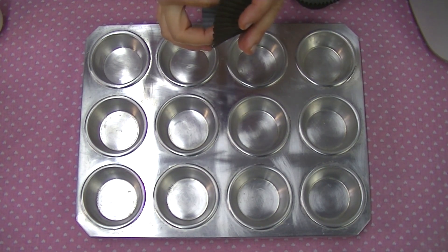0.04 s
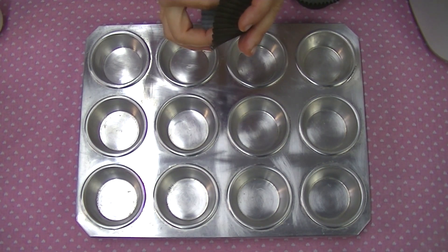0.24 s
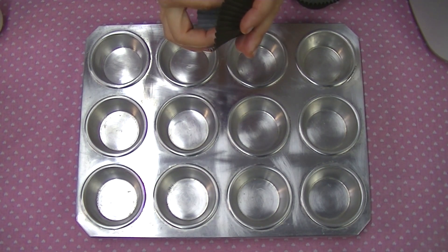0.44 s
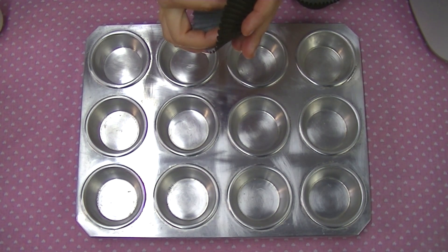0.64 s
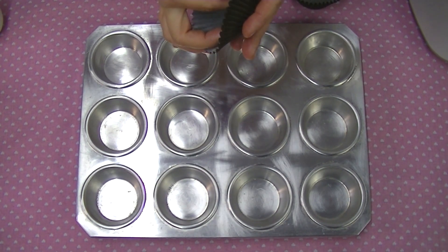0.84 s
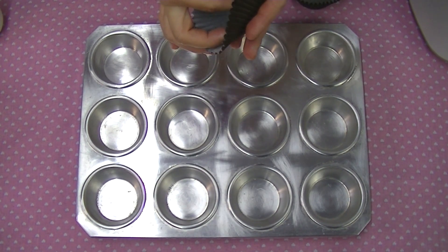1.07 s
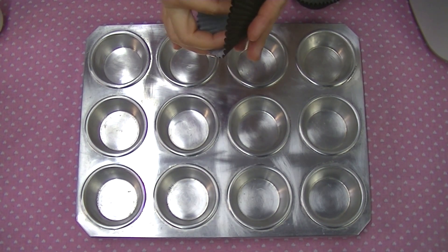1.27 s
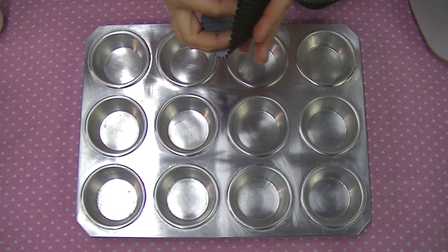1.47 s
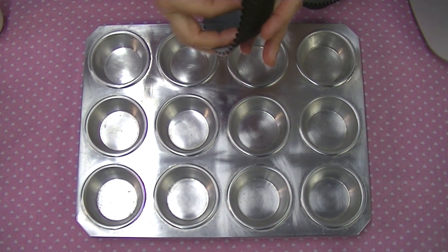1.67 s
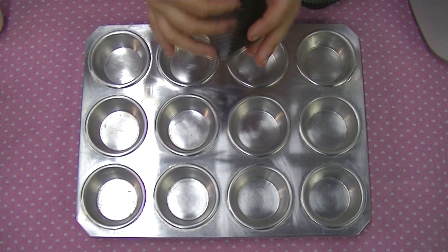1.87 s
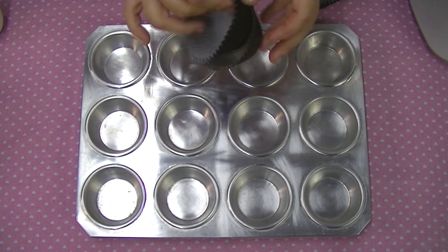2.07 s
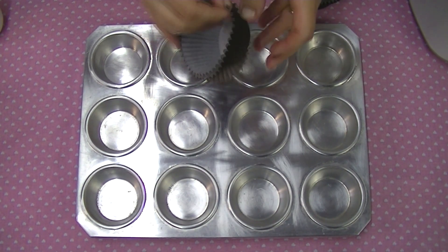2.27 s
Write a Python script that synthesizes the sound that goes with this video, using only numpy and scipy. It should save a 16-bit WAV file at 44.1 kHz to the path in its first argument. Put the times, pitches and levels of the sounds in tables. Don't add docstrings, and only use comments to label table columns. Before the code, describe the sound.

Stiff pleated paper snaps and crackles irregularly between fingers, heard close up, with brief pauses, light hollow pops and a last scraping, squeaky pull as the cup comes free; short room reflections over very quiet hum.

```python
import sys
import numpy as np
from scipy import signal
from scipy.fft import rfft, irfft, next_fast_len
from scipy.io import wavfile
from scipy.ndimage import uniform_filter1d

SR = 44100
rng = np.random.default_rng(int(sys.argv[2]) if len(sys.argv) > 2 else 0)


def inscribe(sig):
    pcm = np.round(np.clip(np.atleast_2d(sig).T, -1, 1) * 32767)
    wavfile.write(sys.argv[1], SR, pcm.astype(np.int16))


def amplitude_ratio(level_db):
    exponent = np.asarray(level_db, float) / 20
    return 10 ** exponent


N = 102179
PADDED = next_fast_len(N + SR // 2)
FREQ = np.fft.rfftfreq(PADDED, 1 / SR)
TIME = np.arange(N) / SR

# pitch_hz, level_db
HUM_COLOUR = [(25, -26), (120, -24.5), (170, -14.5), (240, -16.5), (370, -2), (900, -5), (1900, -13),
              (7000, -21.5), (15500, -26.5)]
# pitch_hz, likeness (0 to 1)
LEFT_RIGHT_LIKENESS = [(25, 0.41), (60, 0.19), (240, 0.86), (950, 0.79), (3770, 0.7), (8000, 1), (15000, 1)]
# pitch_hz, time_to_fade_60_db_s
WALL_FADE = [(300, 0.15), (2000, 0.41), (8000, 0.26), (15000, 0.2)]
# start_s, rise_s, fall_s, level_db, tilt_db_per_octave
SLIDES = [(0.065, 0.0047, 0.052, -54.5, -3.5), (0.162, 0.067, 0.023, -56.5, -3),
          (0.268, 0.0085, 0.012, -61.5, -4.5), (0.755, 0.018, 0.036, -73.5, -9.5),
          (0.899, 0.059, 0.086, -55.5, -5), (0.972, 0.028, 0.04, -57, -9), (1.111, 0.012, 0.03, -51, -5),
          (1.329, 0.0072, .07, -57.5, -8), (1.487, 0.0045, 0.046, -53, -4.5),
          (1.539, 0.039, 0.028, -56, -2.5), (1.65, 0.09, 0.25, -53, -5), (1.76, 0.033, 0.0085, -66, -10.5),
          (1.839, 0.014, 0.015, -53, -3.5), (1.894, 0.0054, 0.068, -57.5, -3),
          (1.967, 0.0034, 0.028, -50, 0.5), (1.986, 0.004, 0.1, -55, 0), (2.023, 0.008, 0.053, -43, 2),
          (2.042, 0.03, 0.058, -36.5, 1), (2.121, 0.012, 0.064, -45.5, 0),
          (2.164, 0.0089, 0.072, -53.5, -3.5), (2.275, 0.01, 0.032, -56.5, 6),
          (2.207, 0.027, 0.054, -41.5, -0.5), (2.248, 0.022, 0.073, -48, -3),
          (2.303, 0.0068, .03, -55, 5.5)]
# pitch_hz, level_db
PAPER_COLOUR = [(180, -68), (300, -63), (348, -46), (1120, -13.5), (2570, -11), (3190, -14.5), (10700, -6),
                (16000, -20)]
# pitch_hz, width_hz, level_db
CUP_TONES = [(1155, 44, 14), (2204, 475, 11.5), (3200, 250, 16.5), (4190, 810, 14.5)]
CUP_FREE_S = 2.01, 2.245
# from_s, to_s, pitch_hz, width_hz, level_db
GAPS = [(0.93, 1.2, 7480, 840, 2), (0.91, 0.99, 3900, 600, -4), (1.016, 1.1, 2300, 650, 7),
        (1.3, 1.43, 1240, 1200, -6.5), (1.5, 1.68, 4730, 500, -3.5), (2.125, 2.21, 6400, 2700, 0),
        (2, 2.07, 1190, 380, 2), (2.14, 2.27, 1030, 350, 2.5), (2.22, 2.29, 3220, 480, 5),
        (1.78, 1.87, 2040, 350, -0.5)]
# start_s, length_s, pitch_hz, level_db
SQUEAKS = [(1.78, 0.013, 1844, -49), (2.065, 0.011, 3090, -50), (2.08, .01, 4220, -39),
           (2.089, 0.029, 3200, -39.5), (2.12, 0.014, 3200, -51), (2.166, 0.0091, 11650, -50),
           (2.168, 0.016, 3440, -50), (2.242, 0.016, 4210, -45), (2.259, 0.025, 4023, -43),
           (2.264, 0.013, 2370, -55), (2.28, 0.011, 9900, -49)]
# start_s, peak_db, pitch_hz, time_to_fade_60_db_ms
POPS = [(.279, -53, 2500, 13), (.341, -47, 1194, 20), (.357, -57.5, 927, 20), (.643, -58, 1740, 43),
        (.669, -43, 1610, 11.3), (.717, -43.5, 1310, 9.4), (.749, -39, 1636, 14.6), (.750, -48.5, 420, 35),
        (.7595, -56, 1680, 11), (.768, -60, 1390, 11), (.778, -51, 1130, 18), (.789, -52.5, 1204, 20),
        (.796, -58, 1490, 8.6), (.809, -63, 1480, 9.2), (.962, -42, 2040, 12), (1.0375, -24, 2060, 3.7),
        (1.266, -46, 810, 12), (1.319, -38, 890, 8.1), (1.3735, -41, 1070, 9.5), (1.4092, -44, 1660, 13),
        (1.449, -52.5, 1000, 10), (1.5128, -37, 1520, 6.2), (1.512, -45.5, 443, 25),
        (1.5266, -39.5, 980, 7), (1.540, -42, 1660, 10), (1.543, -37.5, 846, 8.1), (1.574, -50, 700, 15),
        (1.733, -40, 1680, 9.4), (1.7785, -27, 1896, 13.5), (1.779, -34.5, 4100, 9.3),
        (2.121, -38, 2640, 27)]
# middle_s, peak_db, pitch_hz, half_length_ms, pitch_spread (natural log)
TEARS = [(.710, -39, 5400, 2.7, 0.75), (.9015, -20.5, 8600, 1.77, 0.76), (.949, -33, 9500, 1, 0.34),
         (.990, -20, 10100, 3.5, 0.51), (.9955, -21, 8000, 1.8, 0.56), (1.0065, -11.5, 9500, 1.9, 0.51),
         (1.039, -15, 8000, 1.3, 0.575), (1.073, -29, 8800, 2.7, 0.65), (1.117, -10.5, 9560, 2.39, 0.75),
         (1.279, -33.5, 4200, 3.8, .3), (1.492, -27.5, 11000, 2.16, 0.76), (1.765, -27.5, 4600, 2.5, 0.33),
         (1.946, -39, 9500, 1.1, 0.34), (2.052, -23, 7000, 2.2, 0.3), (2.065, -14, 8600, 1.93, 0.43),
         (2.085, -13, 10000, 2.66, .35), (2.2, -27.5, 8000, 1.6, 0.65), (2.239, -20.5, 4120, 2.31, .5)]
# start_s, peak_db, pitch_hz, length_ms, pitch_spread (natural log)
SNAPS = [(.279, -47.5, 3000, 2.2, 0.33), (.542, -36.5, 6050, 3.95, 0.76), (.644, -46.5, 5000, 2.6, 0.13),
         (.669, -25.5, 5620, 2.26, 0.246), (.7165, -29.5, 7550, 3.56, 0.67),
         (.8565, -40.5, 7750, 2.8, 0.72), (.9115, -24, 10000, 1.62, 0.52), (.9245, -32.5, 9700, 2.5, .55),
         (.935, -43, 9000, 1.1, 0.49), (.9558, -25, 8400, 5.2, 0.57), (.9745, -46, 10000, 1.7, 0.33),
         (1.0205, -40, 9100, 1.5, 0.35), (1.0995, -23.5, 8700, 2.6, 0.85), (1.110, -24, 4000, 3.13, 0.66),
         (1.1812, -28.5, 11300, 3.5, 0.47), (1.2275, -40, 9000, 2.8, .59), (1.2325, -28, 3700, 2.03, 0.36),
         (1.238, -26, 4900, 1.3, 0.54), (1.2395, -15.5, 6800, 3.8, 0.79), (1.308, -38, 11000, 2, 0.29),
         (1.319, -23.5, 2810, 3.04, 0.26), (1.3325, -20, 8960, 2.8, 0.59), (1.3735, -43, 4030, 1.4, .5),
         (1.398, -41.5, 6460, 2.3, 0.36), (1.461, -47, 9500, 2, .25), (1.479, -44, 9700, 1.5, 0.52),
         (1.4985, -43, 8600, 1.9, 0.47), (1.5125, -40.5, 3200, 2.2, 0.53), (1.5263, -37.5, 2170, 1.9, 0.29),
         (1.699, -28.5, 4750, 3.1, 0.071), (1.6993, -25, 10900, 3, 0.35), (1.7185, -26, 10300, 3.96, 0.32),
         (1.7243, -24, 10200, 2, 0.54), (1.7285, -26.5, 11100, 2, 0.42), (1.7325, -28, 10700, 1.5, 0.54),
         (1.754, -52, 10000, 1.5, .3), (1.759, -19, 11400, 4.6, 0.41), (1.9145, -35, 4500, 3.3, 0.048),
         (1.9755, -44, 9000, 2.5, .4), (1.9895, -35, 10000, 4, 0.25)]

HUM_DB = -66
WHINE_HZ, WHINE_WIDTH_HZ, WHINE_DB = 5600, 1000, -6
ROOM_DB, ROOM_SIDE_DB, WALL_S = -9.5, -20, 0.004
TRAY_S, TRAY_DB = 0.00137, -21
RISE_DB, FALL_DB = 12.5, 19.5
SHEET_HZ, CUP_HZ = 700, 237
DULL_HZ, TOP_HZ = 16400, 15800


def unit(x):
    return x / np.sqrt(np.mean(x ** 2) + 1e-20)


def along(points, hz):
    f, v = np.transpose(points)
    return np.interp(np.log(hz + 1), np.log(f + 1), v)


def filtered(x, response):
    return irfft(rfft(x, PADDED) * response, PADDED)[..., :N]


def resonance(hz, width_hz):
    return 1j * FREQ * width_hz / (hz * hz - FREQ ** 2 + 1j * FREQ * width_hz)


def high_pass(hz):
    return (1j * FREQ / hz / (1 + 1j * FREQ / hz)) ** 4


def grains(start_s, hz, fade_s, gain, phase, size=256, onset=4):
    t = np.arange(size) / SR
    wave = np.sin(2 * np.pi * (hz[:, None] * t + phase[:, None]))
    wave = gain[:, None] * wave * amplitude_ratio(-60 * t / fade_s[:, None])
    wave = wave * (1 - np.exp(-onset * t * hz[:, None]))
    first = np.round(np.clip(start_s, 0, None) * SR).astype(int)
    where = first[:, None] + np.arange(size)
    return np.bincount(where.ravel(), wave.ravel(), N + SR)[:N]


def hum():
    whine_gain = amplitude_ratio(along(HUM_COLOUR, WHINE_HZ) + 12.0 + WHINE_DB)
    whine = whine_gain * np.abs(resonance(WHINE_HZ, WHINE_WIDTH_HZ)) ** 2
    colour = amplitude_ratio(along(HUM_COLOUR, FREQ)) + whine
    turn = np.arccos(np.clip(along(LEFT_RIGHT_LIKENESS, FREQ), -1, 1)) / 2
    noise = rng.standard_normal((2, N))
    mid, side = filtered(noise, colour * [np.cos(turn), np.sin(turn)])
    return amplitude_ratio(HUM_DB) * unit(np.array([mid + side, mid - side]))


def kitchen(x, count=8):
    wet = np.zeros((2, N + SR))
    for k, part in enumerate(np.array_split(x, count)):
        hz, t, z = signal.stft(rng.standard_normal((2, SR // 2)), SR, nperseg=256)
        fade = amplitude_ratio(-60 * t / along(WALL_FADE, hz)[:, None])
        tail = signal.istft(z * fade, SR, nperseg=256)[1]
        answer = signal.fftconvolve(part[None], tail / np.linalg.norm(tail[0]), axes=1)
        at = k * (N // count + 1) + int(WALL_S * SR)
        wet[:, at:at + answer.shape[1]] += answer
    mid, side = wet[0, :N], amplitude_ratio(ROOM_SIDE_DB) * wet[1, :N]
    return np.array([mid + side, mid - side])


def tray(paper):
    echo = amplitude_ratio(TRAY_DB) * np.exp(-2j * np.pi * FREQ * TRAY_S)
    return filtered(paper, (1 + echo) / (1 + (FREQ / DULL_HZ) ** 6))


def fibre_ticks(count=90000, clump_db=1, clump_s=0.002, patchy_db=2.2):
    ticks = np.bincount(rng.integers(N, size=count), rng.standard_normal(count), N)
    wide = int(clump_s * SR) + 1
    clumps = uniform_filter1d(uniform_filter1d(rng.standard_normal(N), wide), wide)
    ticks = ticks * amplitude_ratio(clump_db * unit(clumps))
    z = signal.stft(ticks, nperseg=128)[2]
    patches = uniform_filter1d(rng.standard_normal(z.shape), size=3, axis=0)
    patches = uniform_filter1d(patches, size=7, axis=1)
    return unit(signal.istft(z * amplitude_ratio(patchy_db * unit(patches)), nperseg=128)[1][:N])


def slides(pivot_hz=4000):
    ticks = fibre_ticks()
    octaves = np.log2((FREQ + 300) / pivot_hz)
    size = 2 * len(FREQ) - 2
    spectrum = 0
    for s, rise, fall, db, tilt in SLIDES:
        top = s + rise
        moments = [s - 0.002, s, top, top + fall, top + 2 * fall]
        stroke_db = np.interp(TIME, moments, [-60, -RISE_DB, 0, -FALL_DB, -60])
        spectrum = spectrum + rfft(ticks * amplitude_ratio(db + stroke_db), size) * amplitude_ratio(tilt * octaves)
    colour = amplitude_ratio(along(PAPER_COLOUR, FREQ))
    rub = irfft(spectrum * colour / np.sqrt(np.mean(colour ** 2)))[:N]
    singing = np.interp(TIME, CUP_FREE_S, [0.3, 0.16])
    cup = sum(amplitude_ratio(db) * resonance(hz, width) for hz, width, db in CUP_TONES)
    return rub + filtered(rub * singing, cup)


def gaps(x, edge_s=0.0061):
    rings = 0
    for a, b, hz, width, db in GAPS:
        is_open = np.interp(TIME, [a - edge_s, a, b, b + edge_s], [0, 1, 1, 0])
        rings = rings + amplitude_ratio(db) * filtered(x * is_open, resonance(hz, width))
    return x + rings


def squeaks(rough_s=0.0021):
    total = 0
    for s, length, hz, db in SQUEAKS:
        swell = np.sin(np.pi * np.clip((TIME - s) / length, 0, 1)) ** 0.19
        flutter = filtered(rng.standard_normal(N), resonance(hz, 1 / (np.pi * rough_s)) ** 2)
        total = total + amplitude_ratio(db) * swell * unit(flutter)
    return total


def pops(count=5):
    s, db, hz, ms = (c[:, None] for c in np.transpose(POPS))
    step = np.array([0, -1, 1.3, 2.6, 4])
    weaker_db = np.array([0, 6, 7, 11, 15])
    scatter = 0.15 * rng.standard_normal((len(s), count)) * (step != 0)
    f = hz * np.exp(0.31 * step + scatter)
    fade_s = ms / 1000 * hz / f
    rows = (s + 0 * f, f, fade_s, amplitude_ratio(db + 3 - weaker_db), 0 * f)
    return grains(*(a.ravel() for a in rows), size=1400, onset=1.5)


def volley(table, when, fade_db, near=0.052, cycles=9):
    s, db, hz, ms, spread = (c[:, None] for c in np.transpose(table))
    count = when.shape[1]
    pitch = 2 * (rng.random(when.shape).argsort(axis=1) + 0.5) / count - 1
    size, phase = rng.random((2, *when.shape))
    width = np.where(np.arange(count) % 3, spread, near)
    f = hz * np.exp(width * 2 * pitch)
    gain = amplitude_ratio(db + fade_db) * (0.5 + size) * np.sqrt(f / hz) * (f < TOP_HZ)
    rows = (s + when * ms / 1000, f, cycles / f, gain, phase)
    return grains(*(a.ravel() for a in rows))


def tears(count=90):
    when = 4 * rng.random((len(TEARS), count)) - 2
    return volley(TEARS, when, -11 - 7 * np.abs(when))


def snaps(count=60):
    is_later = np.arange(count) > 1
    when = 1.8 * rng.random((len(SNAPS), count)) ** 1.5 * is_later
    return volley(SNAPS, when, -8 - 10.5 * when)


def scene():
    cracks = filtered(snaps() + tears(), high_pass(SHEET_HZ))
    paper = squeaks() + gaps(cracks + slides()) + filtered(pops(), high_pass(CUP_HZ))
    near = tray(paper)
    return near + amplitude_ratio(ROOM_DB) * kitchen(near) + hum()


def band_limit(x):
    return signal.sosfilt(signal.butter(12, 16510, fs=SR, output="sos"), x)


def record(dry):
    mix = filtered(dry, np.where(FREQ < TOP_HZ, 1, amplitude_ratio(-46)))
    return band_limit(mix)


dry = scene()
out = record(dry)
inscribe(out)
```